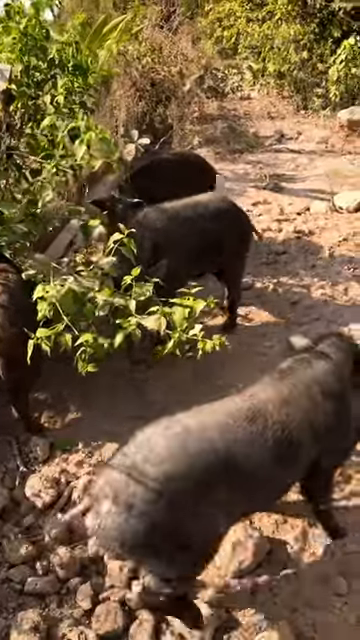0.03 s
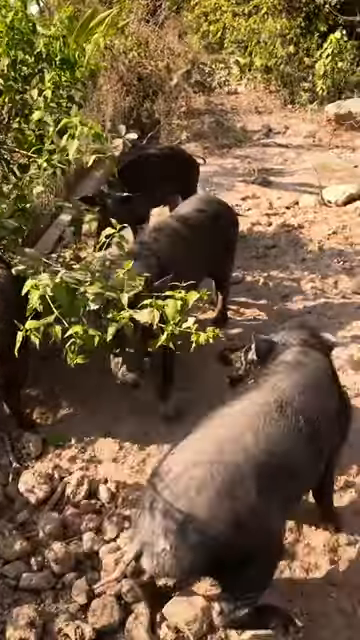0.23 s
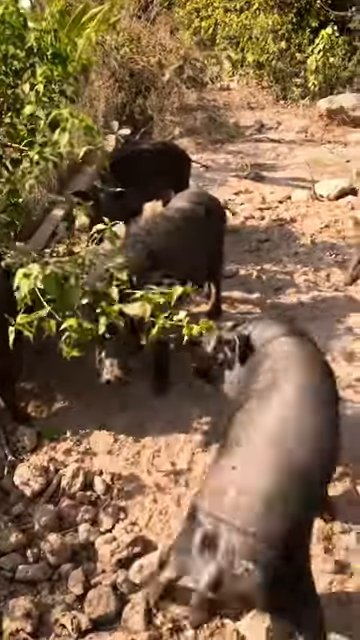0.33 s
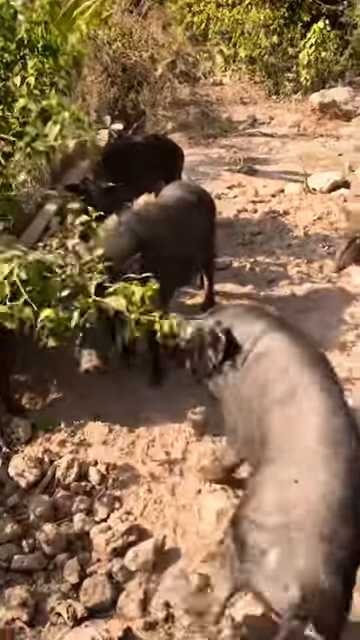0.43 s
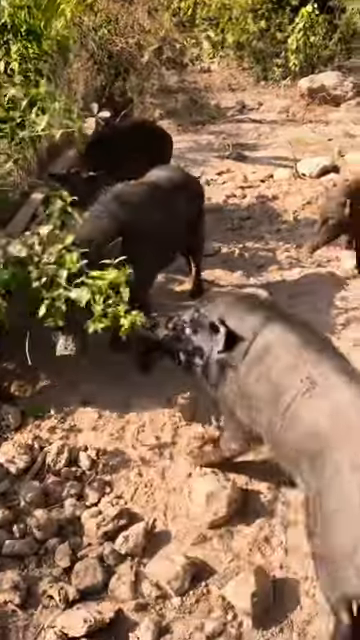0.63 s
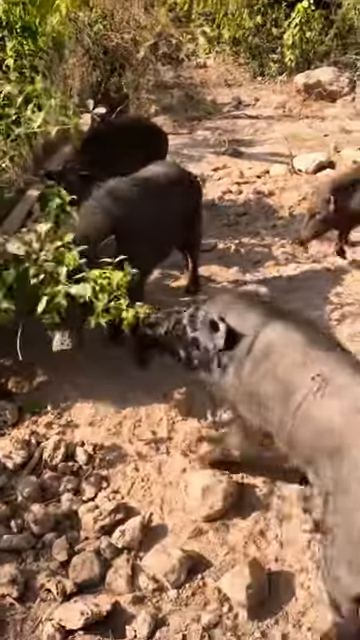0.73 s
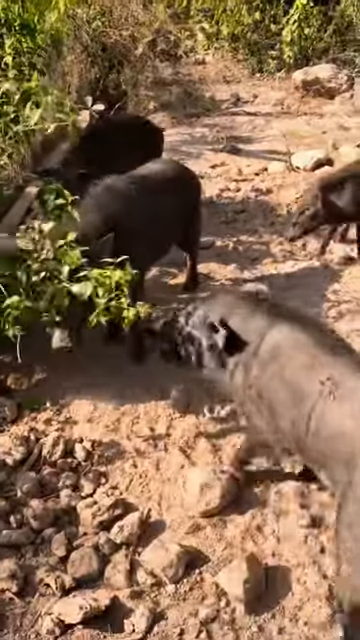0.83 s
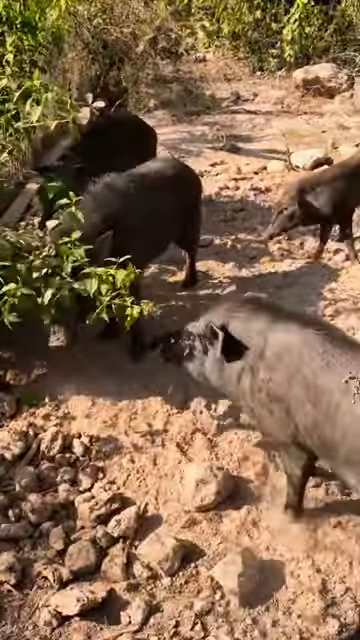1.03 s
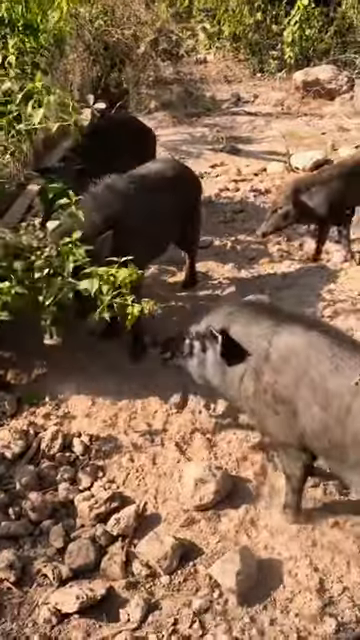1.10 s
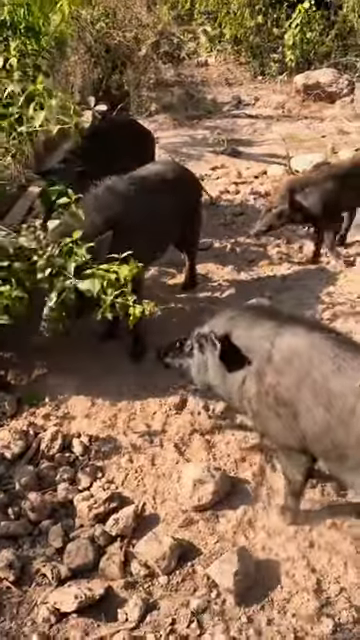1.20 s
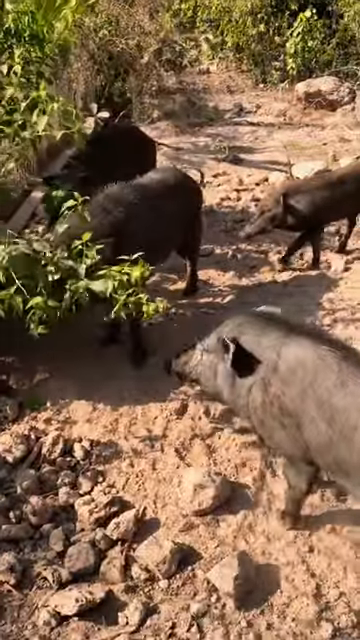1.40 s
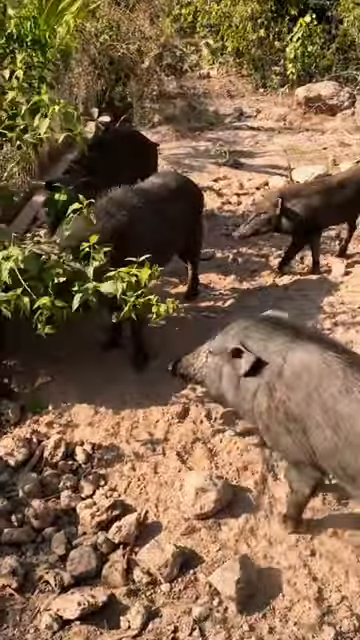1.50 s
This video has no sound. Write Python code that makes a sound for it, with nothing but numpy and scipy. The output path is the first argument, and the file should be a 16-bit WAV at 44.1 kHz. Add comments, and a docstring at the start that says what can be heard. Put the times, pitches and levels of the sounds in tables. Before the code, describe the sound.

One rasping pig grunt outdoors, followed by light hoof scuffs, small snaps and a softer grunt.

```python
"""A pig gives one rough grunt on dry, stony ground: slow, uneven flaps of the throat ring its
chest and throat, and wet, rasping air sings in its snout. Then hooves scuff the grit, twigs snap,
a stone knocks, and a pig farther off grunts softly. Behind it all are a faint bird, a dull
scatter from the hillside and a low outdoor rumble."""
import sys
import numpy as np
from scipy import signal
from scipy.fft import rfft, irfft
from scipy.io import wavfile
from scipy.ndimage import uniform_filter1d

SR = 44100
rng = np.random.default_rng(int(sys.argv[2]) if len(sys.argv) > 2 else 0)


def to_wav(s):
    """Save 16-bit WAV."""
    ch = np.atleast_2d(s).T  # columns
    pcm = np.round(np.clip(ch, -1, 1) * 32767)  # PCM
    wavfile.write(sys.argv[1], SR, pcm.astype(np.int16))


N = 68355
T = np.arange(N) / SR

# Pace of the throat's flapping. Each row: time in seconds, flaps per second.
FLAP_RATE = [(.14, 108), (.24, 133), (.252, 77), (.267, 62), (.303, 100), (.342, 63), (.372, 63),
             (.4, 89.3), (.445, 106.5), (.48, 131)]
# The mouth opening. Each row: time in seconds, opening from 0 (narrow) to 1 (wide).
MOUTH = [(.3, 0.1), (.41, 0.82)]
def grunt():
    """The near pig: one train of flaps drives throat, chest and snout as the mouth opens."""
    age = flaps(curve(FLAP_RATE))
    opening = curve(MOUTH)
    open_leak = 0.15 * opening   # the flaps seal less well as the mouth opens
    flow = airflow(age, noise=0.91, leak=0.6 + open_leak, decay_s=0.007)
    body = throat(flow, opening) + chest(flow)
    return body + clear_tones(age) + jolts() + snout(age, opening, open_leak)


def flaps(rate_hz, jitter=0.02, anchor_s=0.229):
    """Seconds since the throat last slapped shut; the flaps fall unevenly, one near anchor_s."""
    cycles = np.cumsum(rate_hz) / SR
    cycles -= np.interp(anchor_s, T, cycles)
    count = np.arange(-60, 200)
    times = np.sort(np.interp(count + jitter * rng.standard_normal(len(count)), cycles, T))
    latest = np.maximum(np.searchsorted(times, T, "right") - 1, 0)
    return T - times[latest]


def airflow(age, noise, leak, decay_s):
    """Each flap is a slap and a dying puff of turbulence; some air leaks in between."""
    slaps = unit(1. * (age < 1 / SR))
    puffs = unit(rng.standard_normal(N) * (np.exp(-age / decay_s) + leak))
    return slaps + noise * puffs


# The grunt's vowel. Each row: centre in Hz, width in Hz, dB with the mouth narrow, dB with it wide.
THROAT_FORMANTS = [(416.3, 14, -11, -6.5), (551, 59, -12.5, -5.5), (690, 20.5, -6.5, -0.5),
                   (786, 34, 0, 1.5), (850, 72, 2, -3), (1092, 38, -11.5, -2.5), (1159, 75, -1.5, -3.5),
                   (1238, 91, 3, -9), (1410, 53, -8, -9.5), (1630, 110, -8.5, -18.5),
                   (1870, 130, -16, -14.5)]
# The push behind the grunt. Each row: time in seconds, level in dB.
THROAT_LEVEL = [(.145, -76), (.15, -50), (.163, -56), (.171, -29.5), (.188, -47), (.215, -27), (.232, -22),
                (.254, -20.5), (.3, -23.5), (.372, -25.5), (.396, -21.5), (.445, -22), (.468, -28),
                (.48, -46), (.5, -78)]
def throat(flow, opening):
    """The airflow rings the throat's resonances; their balance shifts as the mouth opens."""
    voice = sum((-1) ** k * unit(resonate(flow, hz, width)) * amp(narrow + (wide - narrow) * opening)
                for k, (hz, width, narrow, wide) in enumerate(THROAT_FORMANTS))
    return even(cut(cut(voice, 1900, order=4), 313, "high")) * fade(THROAT_LEVEL)


# Weight under the grunt. Each row: time in seconds, level in dB.
CHEST_LEVEL = [(.13, -71), (.19, -40.5), (.243, -34.5), (.28, -36), (.35, -36.5), (.4, -43), (.465, -38),
               (.49, -61)]
def chest(flow):
    """The airflow booms in one broad, low resonance of the chest."""
    boom = resonate(flow, hz=156, width_hz=410)
    return even(cut(cut(boom, 382), 64.5, "high")) * fade(CHEST_LEVEL)


# Pitched glints in the grunt, one list per tone. Each row: time in seconds, pitch in Hz, level in dB.
GRUNT_TONES = [
    [(.375, 412, -42), (.405, 418, -32), (.428, 423, -30), (.447, 420, -42), (.485, 398, -50)],
    [(.335, 1175, -40), (.36, 1168, -32), (.43, 1160, -34), (.464, 1176, -21.5), (.484, 1172, -39),
     (.53, 1169, -81)],
    [(.41, 1040, -44), (.43, 1067, -32), (.445, 1094, -23.5), (.468, 1115, -42)],
    [(.15, 1000, -63), (.173, 947, -36), (.187, 930, -52), (.213, 845, -31), (.25, 792, -28),
     (.335, 775, -33)],
    [(.218, 1350, -44), (.23, 1310, -24), (.242, 1255, -35), (.33, 1230, -33)],
]
def clear_tones(age):
    """Clear tones come through the grunt, fluttering with the flaps."""
    flutter = unit(resonate(1. * (age < 1 / SR), hz=91.5, width_hz=180))
    return sum(tone(track) for track in GRUNT_TONES) * (1 + 0.34 * flutter)


# The grunt's attack. Each row: start in seconds, force in dB.
JOLTS = [(.2368, -13), (.2448, -12), (.2575, -14)]
# Its ring. Each row: pitch in Hz, gain in dB, seconds to fall 60 dB.
JOLT_MODES = [(137, -10, 0.011), (414, -15.5, 0.052), (838, -4.5, 0.018), (1160, 1.5, 0.033),
              (1400, -7, 0.024)]
def jolts():
    """The hardest slaps of the throat, as the grunt breaks out."""
    slaps = strike(JOLTS, JOLT_MODES, scatter_db=-30, scatter_s=0.003)
    return cut(cut(slaps, 1700, order=4), 79.5, "high")


# Envelope of the rasp. Each row: time in seconds, level in dB.
RASP_LEVEL = [(.14, -68), (.17, -46.5), (.188, -57), (.215, -37.5), (.25, -39.5), (.27, -36.5), (.3, -43.5),
              (.34, -28), (.374, -36), (.42, -34), (.468, -36.5), (.484, -63), (.5, -78)]
# Wet squelches. Each row: centre in seconds, half-length in seconds, level in dB.
SQUELCHES = [(.261, 0.011, -29), (.277, 0.0031, -33), (.288, 0.01, -20.5), (.31, 0.0097, -22.5),
             (.325, 0.0053, -28), (.365, 0.0078, -32), (.397, 0.012, -29.5), (.417, 0.0052, -30.5)]
def snout(age, opening, open_leak):
    """Air through the snout throbs with the flaps and surges in squelches."""
    puff_age = age / 0.003   # each puff peaks 3 ms after its flap
    leak = 0.42 + open_leak
    breath = unit(puff_age * np.exp(1 - puff_age) + leak) * fade(RASP_LEVEL)
    surge = swells(SQUELCHES)
    rasp = snout_rasp() * np.hypot(breath, surge)
    hiss = snout_hiss() * np.hypot(breath, 0.36 * surge)
    open_hiss_db = 1   # more hiss escapes from the open mouth
    return rasp + hiss * amp(open_hiss_db * opening)


# The rasp's colour, one list per resonance. Each row: time in seconds, centre in Hz, relative dB.
SNOUT_GLIDES = [
    [(.22, 2680, -2.5), (.25, 2630, 6), (.262, 2300, 7.5), (.28, 2410, 10), (.305, 2400, 6),
     (.335, 2650, -4), (.365, 2400, -5.5), (.45, 2650, -6.5)],
    [(.21, 3630, -5), (.243, 3230, 4.5), (.275, 3070, -18), (.32, 3020, 8), (.365, 2897, -3.5),
     (.41, 3064, 3), (.445, 3193, 0)],
    [(.21, 4460, -6), (.245, 4000, -2.5), (.287, 4090, 6), (.32, 4080, -9), (.45, 4260, 0)],
    [(.21, 4830, -2.5), (.245, 4700, 2), (.27, 4480, -2), (.312, 4440, 9), (.36, 4490, -3), (.39, 4560, -1),
     (.46, 4800, 2)],
    [(.21, 5370, -6.5), (.275, 5400, -4), (.295, 5550, 3.5), (.31, 5240, 0.5), (.34, 5200, -6),
     (.395, 5400, -1), (.425, 5400, -12), (.465, 5650, 5)],
]
# Each entry: the width in Hz of one of those resonances.
SNOUT_WIDTHS_HZ = [195, 193, 217, 258, 500]
def snout_rasp():
    """Air sings in the snout's gliding resonances, each a flickering core with a faint, wide skirt."""
    rasp, power = 0, 0
    for track, width in zip(SNOUT_GLIDES, SNOUT_WIDTHS_HZ):
        hz, gain = curve(track), amp(curve(track, column=2))
        band = whistle(hz, width) + amp(-19) * whistle(hz, 3 * width)
        rasp += band * flicker(db=3, hz=68) * gain
        power += gain ** 2
    return rasp / np.sqrt(power)


# Thin whistles on top. Each row: centre in Hz, width in Hz, relative level in dB.
HISS_WHISTLES = [(7020, 360, 0.5), (8000, 200, -6), (8530, 210, -4), (9570, 500, -4.5), (11220, 330, -5),
                 (13450, 400, -6)]
# EQ of the hiss. Each row: frequency in Hz, gain in dB.
HISS_EQ = [(1500, -16), (2800, -11), (3550, -5), (4800, -18), (5800, 1), (6300, 4), (7000, -5), (8500, -2),
           (16000, -15)]
def snout_hiss(spits_per_s=900):
    """The breathy edge: hissing air with thin whistles and tiny bursts of saliva."""
    whistles = sum(amp(db) * whistle(np.full(N, hz), width) * flicker(db=5, hz=35.8)
                   for hz, width, db in HISS_WHISTLES)
    spit = unit(rng.standard_normal(N) * (rng.random(N) < spits_per_s / SR))
    hiss = colour(rng.standard_normal(N) + 0.6 * spit, HISS_EQ)
    return amp(-17.5) * whistles + amp(-12) * hiss


# Envelope of the farther grunt. Each row: time in seconds, level in dB.
FAR_LEVEL = [(1.365, -79), (1.388, -42), (1.406, -39.5), (1.419, -39.5), (1.44, -44.5), (1.475, -50.5),
             (1.55, -50.5)]
# Its vowel. Each row: centre in Hz, width in Hz, relative level in dB.
FAR_FORMANTS = [(640, 64, 0.5), (850, 130, 0), (1350, 170, -3.5), (1530, 100, -9), (2120, 370, -10.5)]
# Its clear core. Each row: time in seconds, pitch in Hz, level in dB.
FAR_TONE = [(1.4, 1400, -63), (1.414, 1410, -40), (1.4185, 1394, -24), (1.423, 1396, -55),
            (1.433, 1471, -34.5), (1.47, 1290, -56)]
def far_grunt():
    """Another pig's flapping throat gives a short, soft grunt with a clear tone inside."""
    flow = airflow(flaps(rate_hz=np.full(N, 85)), noise=1.5, leak=0.64, decay_s=0.0054)
    voice = sum((-1) ** k * amp(db) * unit(resonate(flow, hz, width))
                for k, (hz, width, db) in enumerate(FAR_FORMANTS))
    return even(cut(cut(voice, 2400), 503, "high")) * fade(FAR_LEVEL) + tone(FAR_TONE)


# Short clicks. Each row: start in seconds, peak in dB, centre in Hz, octaves to either side.
CLICKS = [(0.1663, -26, 5340, 1), (.3968, -18, 1900, 0.45), (0.4356, -22.5, 10100, 0.62),
          (0.6119, -29, 7000, 3.6), (0.8339, -24.5, 7040, 2.1), (0.9074, -23, 5100, 0.65),
          (.918, -25.5, 3880, 0.41), (0.9665, -28.5, 6400, 3.2), (0.9862, -20, 2980, 0.4),
          (1.0009, -21, 3700, 0.66), (1.0173, -19.5, 5940, 0.19), (1.0215, -25, 4000, 1.2),
          (1.043, -20, 1670, 0.44), (1.0542, -17.5, 10100, 0.55), (1.141, -35, 2600, 1.2),
          (1.148, -33.5, 1600, 0.17), (1.2507, -28.5, 12000, 0.3), (1.363, -27, 4100, 0.29)]
def clicks():
    """A wet click in the grunt, and twigs and grit snapping: each a tiny burst with a short tail."""
    out = np.zeros(N)
    for s, db, hz, octaves in CLICKS:
        envelope = burst(s, decay_s=0.00041) + amp(-13) * burst(s, decay_s=0.004)
        edges_hz = hz * 2. ** np.array([-octaves, octaves])
        click = cut(rng.standard_normal(N) * envelope, edges_hz, "band", order=1)
        click = cut(cut(click, hz / 4, "high"), 14000)
        out += amp(db) * click / np.abs(click).max()
    return out


# The twig's bright ring. Each row: pitch in Hz, gain in dB, seconds to fall 60 dB.
TWIG_MODES = [(5350, -19, 0.018), (7100, -16.5, 0.0058), (8850, -2.5, 0.0019), (11840, -3, 0.0023),
              (12800, 1, 0.002), (14800, -22, .003)]
def twig_crack(start_s=1.0953, force_db=-8.5):
    """One dry twig breaks and rings for an instant."""
    crack = strike([(start_s, force_db)], TWIG_MODES, scatter_db=-28.5, scatter_s=0.0022)
    return cut(crack, 3020, "high")


# A knock and its bounces. Each row: start in seconds, force in dB.
STONE_HITS = [(1.2498, -15), (1.2522, -30), (1.2536, -24), (1.2586, -21.5)]
# The stone's duller ring. Each row: pitch in Hz, gain in dB, seconds to fall 60 dB.
STONE_MODES = [(1900, -17, 0.012), (2650, -8.5, 0.0042), (3420, 2.5, 0.0032), (3680, -4, 0.006)]
def stone_knock():
    """A stone knocks and bounces, ringing at each contact."""
    knock = strike(STONE_HITS, STONE_MODES, scatter_db=-23, scatter_s=0.003)
    return cut(cut(knock, 6050), 1600, "high", order=3)


# Hoof scuffs. Each row: centre in seconds, half-length in seconds, level in dB.
SCUFFS = [(0.664, 0.063, -53), (.806, 0.017, -45), (0.831, 0.0092, -42), (0.864, 0.028, -41.5),
          (0.908, 0.009, -39), (1.002, 0.0073, -35.5), (1.02, 0.011, -36.5), (1.06, 0.035, -47),
          (1.108, 0.011, -49), (1.148, 0.017, -48), (1.329, 0.013, -40.5)]
# The herd shuffling farther off. Each row: time in seconds, level in dB.
SHUFFLE_LEVEL = [(0, -61), (.12, -63), (.5, -53.5), (.6, -57), (.78, -53), (.95, -54.5), (1.22, -53),
                 (1.55, -48.5)]
# EQ of the crunch. Each row: frequency in Hz, gain in dB.
GRIT_EQ = [(200, 2), (450, -5.5), (750, 2), (1100, 1.5), (1500, 2.5), (2500, -3), (4200, -3.5), (8000, -8),
           (16000, -12)]
def grit(grains_per_s=14000, spread_db=3.5, q=5.3):
    """Dense grains of dry soil crunch under the hooves, each ringing at one of many pitches."""
    sizes = amp(spread_db * np.minimum(rng.exponential(1, N), 5))
    ticks = sizes * rng.choice([-1, 1], N) * (rng.random(N) < grains_per_s / SR)
    pitches = np.geomspace(300, 15000, 24)
    pitch_index = rng.choice(len(pitches), N, p=np.sqrt(pitches) / np.sqrt(pitches).sum())
    grains = sum(np.sqrt(hz) * unit(resonate(ticks * (pitch_index == k), hz, hz / q))
                 for k, hz in enumerate(pitches))
    return colour(grains, GRIT_EQ) * (swells(SCUFFS) + amp(curve(SHUFFLE_LEVEL)))


# Footfalls. Each row: start in seconds, force in dB, pitch in Hz.
HOOF_STEPS = [(.56, -42.5, 457), (.675, -43.5, 608), (.862, -36, 835), (.908, -40.5, 647),
              (1.063, -41.5, 850), (1.321, -46, 840)]
def hoof_steps(t60_s=0.055):
    """Each hoof lands on hard soil with a short, dull tock."""
    tocks = sum(strike([(s, db)], [(hz, 0, t60_s)], scatter_db=-32, scatter_s=0.012)
                for s, db, hz in HOOF_STEPS)
    return cut(tocks, 1800)


# A faint chirp. Each row: time in seconds, pitch in Hz, level in dB.
BIRD_CALL = [(.495, 5100, -66), (.525, 5400, -62), (.565, 7050, -63)]
def bird():
    """A distant rising call, blurred by the bushes."""
    return whistle(curve(BIRD_CALL), width_hz=320) * fade(BIRD_CALL, column=2)


def hillside(x, t60_s=0.3, wet_db=-37.5):
    """Faint, dull scatter from the slope and bushes."""
    tail = cut(rng.standard_normal(N) * amp(-60 * T / t60_s) * (T > 0.006), 3560)
    return amp(wet_db) * signal.fftconvolve(x, tail / np.sqrt(np.sum(tail ** 2)))[:N]


# EQ of the outdoor bed. Each row: frequency in Hz, gain in dB.
AIR_EQ = [(20, -13), (48, 5.5), (70, 3.5), (120, -4), (155, -1), (200, -10.5), (330, -19.5), (760, -23),
          (1290, -21.5), (1700, -25.5), (4060, -28), (6900, -39.5), (16000, -40)]
def open_air():
    """A steady, low outdoor rumble with a trace of hiss."""
    return amp(-46.5) * colour(rng.standard_normal(N), AIR_EQ)


def strike(hits, modes, scatter_db, scatter_s):
    """Sharp contacts, each with a little scatter, ring a set of modes."""
    force, out = np.zeros(N), 0
    for s, db in hits:
        force[int(s * SR)] += amp(db)
        force += amp(db + scatter_db) * burst(s, scatter_s) * rng.standard_normal(N)
    for hz, db, t60 in modes:
        r, w = amp(-60 / (t60 * SR)), 2 * np.pi * hz / SR
        out += amp(db) * signal.lfilter([0, np.sin(w)], [1, -2 * r * np.cos(w), r * r], force + 1e-18)
    return out


def tone(track, waver_hz=8.2):
    """A gliding, slightly wavering tone."""
    hz = curve(track) + waver_hz * unit(cut(rng.standard_normal(N), 57.3))
    return np.sqrt(2) * np.sin(2 * np.pi * np.cumsum(hz) / SR) * fade(track, column=2)


def whistle(hz, width_hz):
    """Turbulent air sings in one narrow resonance at an even level; rms 1."""
    band = even(glide(rng.standard_normal(N), hz, width_hz), span_s=0.0055)
    return unit(glide(band, hz, 2 * width_hz))


def amp(db):
    """Decibels to gain."""
    return 10 ** (np.asarray(db) / 20)


def unit(x):
    """Scale to rms 1."""
    return x / np.sqrt(np.mean(x ** 2) + 1e-20)


def even(x, span_s=0.02):
    """Hold the level steady over a short span."""
    return x / np.sqrt(np.abs(uniform_filter1d(x ** 2, int(span_s * SR))) + 1e-12)


def curve(rows, column=1):
    """A table's column joined by straight lines in time."""
    rows = np.array(rows)
    return np.interp(T, rows[:, 0], rows[:, column])


def fade(rows, column=1):
    """Gain of a level curve, silent outside its span."""
    return amp(curve(rows, column)) * (T >= rows[0][0]) * (T <= rows[-1][0])


def burst(s, decay_s):
    """Exponential decay from a given moment."""
    return (T >= s) * np.exp(-np.clip((T - s) / decay_s, 0, 60))


def swells(rows):
    """Gain of short, rounded surges."""
    return sum(amp(db) * np.exp(-2 * ((T - s) / half_s) ** 2) for s, half_s, db in rows)


def flicker(db, hz):
    """A random gain that wanders at about the given rate."""
    return amp(db * np.clip(unit(cut(rng.standard_normal(N), hz)), -2, 2))


def colour(x, points):
    """Give a steady sound a spectrum; rms 1."""
    hz, db = np.transpose(points)
    bins_hz = np.maximum(np.arange(N + 1) * SR / (2 * N), 1)
    gain = amp(np.interp(np.log(bins_hz), np.log(hz), db))
    return unit(irfft(rfft(x, 2 * N) * gain)[:N])


def cut(x, hz, kind="low", order=2):
    """Butterworth filter, low-pass by default."""
    sos = signal.butter(order, np.minimum(hz, SR / 2 - 100), kind, fs=SR, output="sos")
    return signal.sosfilt(sos, x + 1e-18)


def resonate(x, hz, width_hz):
    """A resonance at one pitch."""
    r = np.exp(-np.pi * width_hz / SR)
    return signal.lfilter([1, 0, -1], [1, -2 * r * np.cos(2 * np.pi * hz / SR), r * r], x)


def glide(x, hz, width_hz):
    """A steep resonance whose centre moves."""
    turn = np.exp(2j * np.pi * np.cumsum(hz) / SR)
    return (cut(x / turn, width_hz / 2, order=3) * turn).real


def scene():
    """Pigs and ground with their hillside echo, over bird and open air; mono."""
    direct = grunt() + far_grunt() + clicks() + twig_crack() + stone_knock() + grit() + hoof_steps()
    return (direct + hillside(direct) + bird() + open_air())[None]


def record(dry):
    """Roll off the deepest rumble and cut the top steeply."""
    top_cut = signal.ellip(10, 0.2, 80, 15900, fs=SR, output="sos")
    return signal.sosfilt(top_cut, cut(dry, 31.4, "high", order=4))


dry = scene()
out = record(dry)
to_wav(out)
```